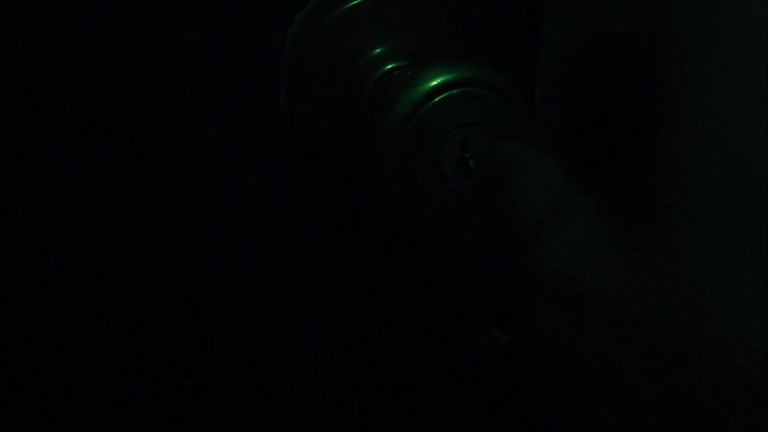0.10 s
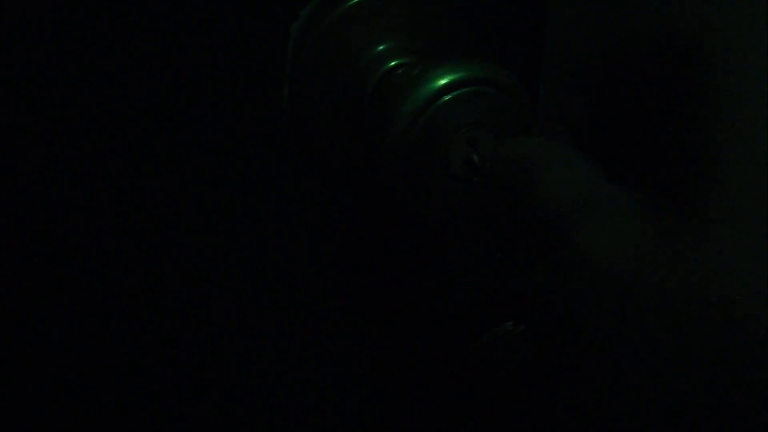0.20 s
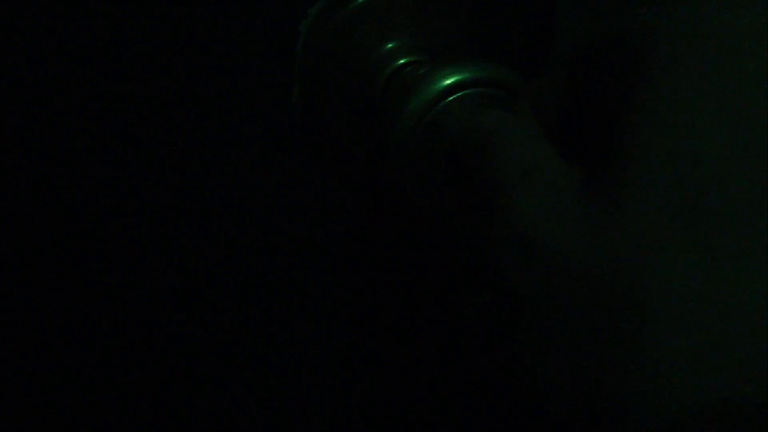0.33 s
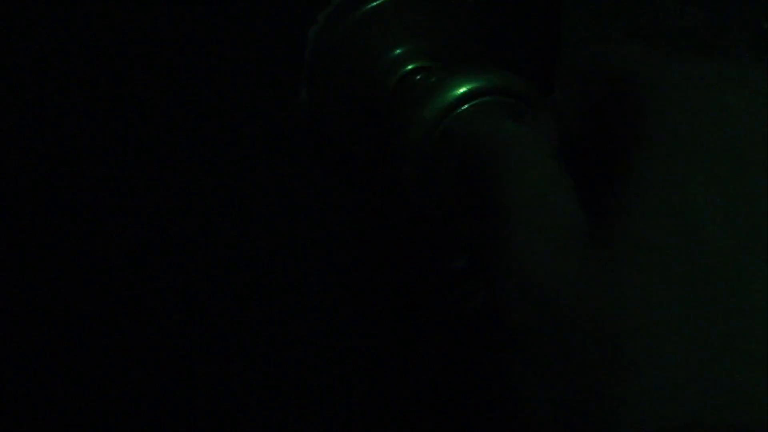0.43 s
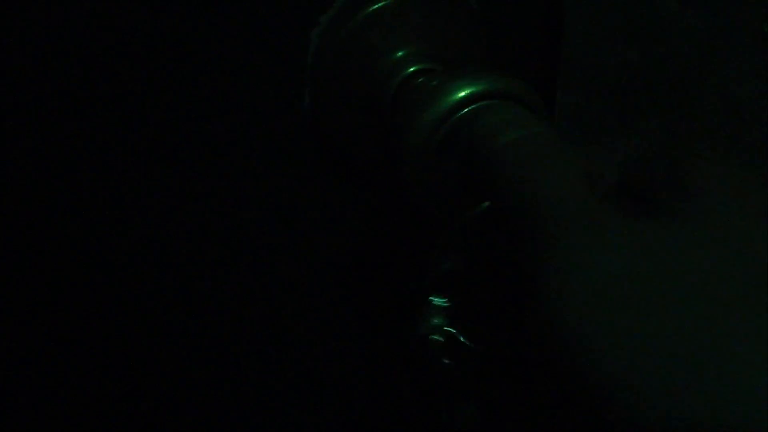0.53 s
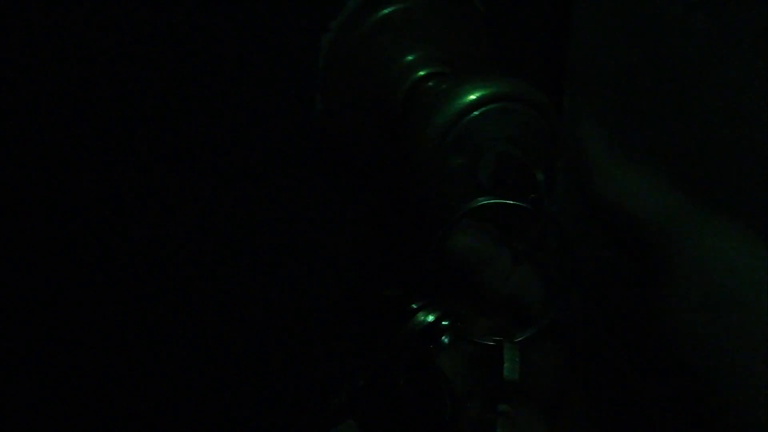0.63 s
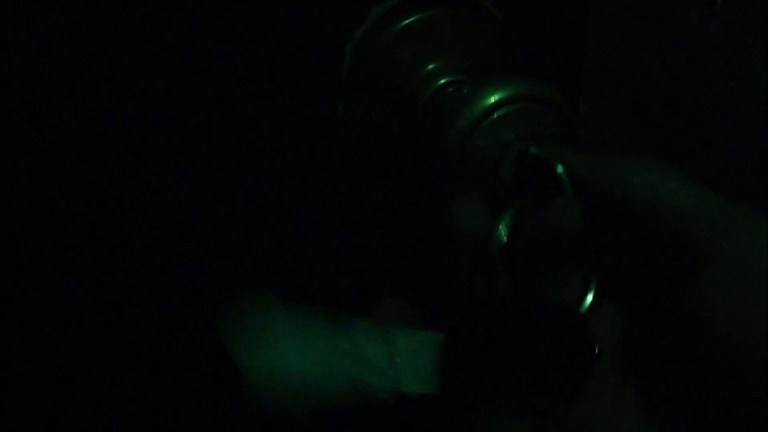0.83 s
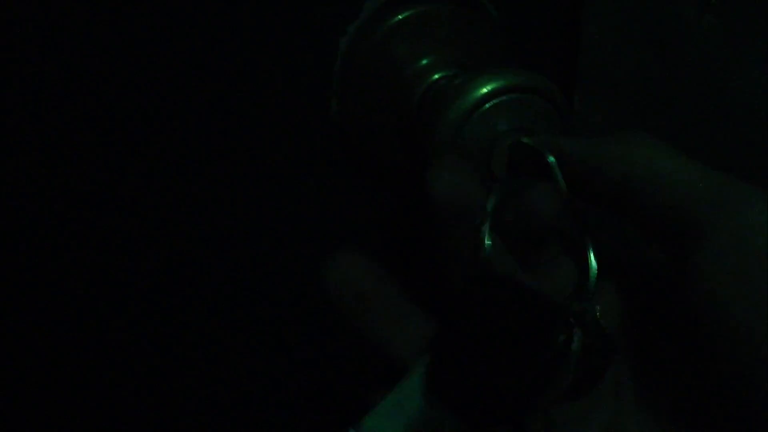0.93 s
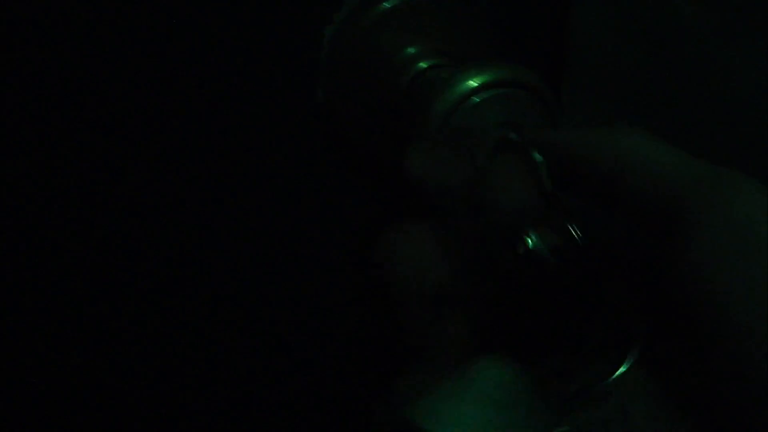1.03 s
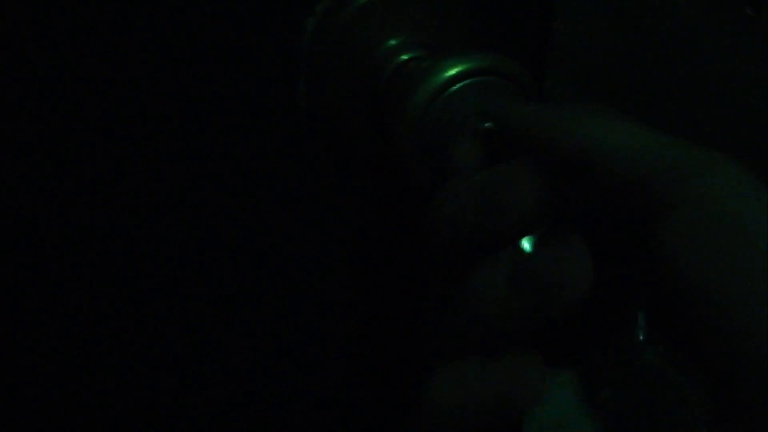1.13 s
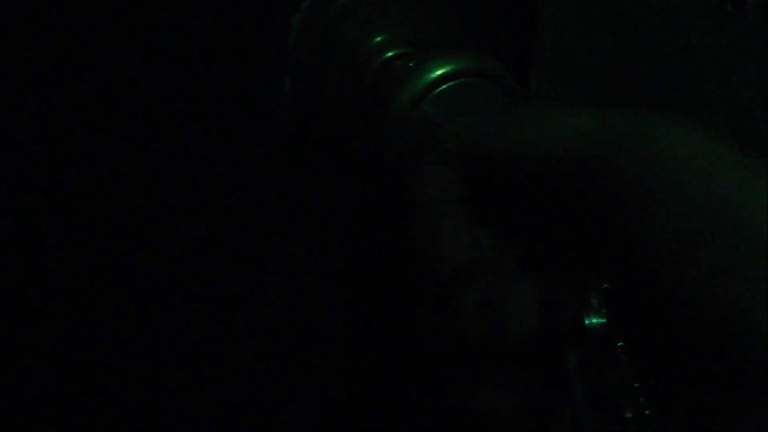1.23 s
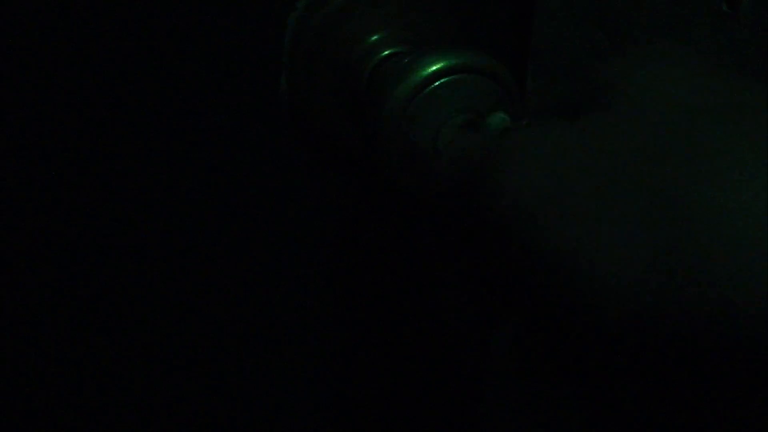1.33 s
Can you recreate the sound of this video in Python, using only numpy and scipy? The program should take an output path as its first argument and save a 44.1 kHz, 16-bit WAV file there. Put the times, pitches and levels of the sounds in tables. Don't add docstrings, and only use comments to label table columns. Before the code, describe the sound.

Keys jangle in a door lock, close up in stereo. Near silence with a faint click at 0.06 s; at 0.22-0.4 s the sticking bolt grinds and knocks the hollow wood amid sharp metallic cracks. Sparse bright clicks follow from 0.5-0.8 s. The bunch jingles loudest at 0.83-0.97 s, then weaker clinks, soft fob pats and a thin squeak near 1.3 s. Short porch reflections, faint night air.

```python
import sys
import numpy as np
from scipy import signal
from scipy.fft import rfft, irfft, next_fast_len
from scipy.io import wavfile
from scipy.ndimage import map_coordinates

SR = 44100
rng = np.random.default_rng(int(sys.argv[2]) if len(sys.argv) > 2 else 0)


def linear_from_db(decibels):
    return 10 ** (np.asarray(decibels, float) / 20)


def dump_mix(stems):
    frames = np.atleast_2d(stems).T
    limited = np.clip(frames, -1, 1)
    pcm = np.round(limited * 32767).astype(np.int16)
    wavfile.write(sys.argv[1], SR, pcm)


N = 61740

# frequency in Hz, density in dB per Hz.
CONTACT_NOISE = [(410, -11.5), (700, -12), (1380, -10), (4110, -3), (6270, -7.5), (9540, -4), (11900, -1.5),
                 (13500, -17.5)]
CRACK_T60_S = 0.011


def unit(x):
    return x / np.sqrt(np.mean(x ** 2) + 1e-20)


def along(points, hz):
    f, v = np.transpose(points)
    return np.interp(np.log(hz + 1), np.log(f + 1), v)


def curve(rows):
    return np.interp(np.arange(N) / SR, *np.transpose(rows))


def filtered(x, response):
    m = next_fast_len(N + SR // 2)
    return irfft(rfft(x, m) * response(np.fft.rfftfreq(m, 1 / SR)), m)[..., :N]


def add(track, s, sound):
    part = track[..., round(s * SR):][..., :sound.shape[-1]]
    part += sound[..., :part.shape[-1]]


def ring(hz, t60, t):
    return linear_from_db(-60 * t / t60) * np.sin(2 * np.pi * hz * t)


def sparks(per_s, spread_db):
    chance, sign, size = rng.random((3, N))
    return (chance < per_s / SR) * np.sign(sign - .5) * linear_from_db(-spread_db * np.log(size + 0.0024))


def flutter(t):
    return map_coordinates(rng.standard_normal(SR // 50), [t * 150])


def night():
    # frequency in Hz, density in dB per Hz.
    air_colour = [(15, -78), (25, -15.5), (200, 0), (386, -2.5), (464, -0.5), (620, -7), (1080, -5),
                  (10400, -31), (13500, -57)]
    # frequency in Hz, left-right likeness from 0 to 1.
    likeness = [(100, 0.09), (500, 0.067), (2000, 0.041)]
    level_db = -47.5

    def mid_side(hz):
        turn = np.arccos(np.clip(along(likeness, hz), -1, 1)) / 2
        return linear_from_db(along(air_colour, hz)) * [np.cos(turn), np.sin(turn)]

    mid, side = filtered(rng.standard_normal((2, N)), mid_side)
    return linear_from_db(level_db) * np.array([mid + side, mid - side]) / np.std(mid)


def porch(x):
    # frequency in Hz, decay time t60 in seconds.
    decay = [(200, 0.3), (2000, 0.092), (10000, 0.065)]
    out, step = np.zeros((2, N)), SR // 10
    for i in range(0, N, step):
        hz, t, z = signal.stft(rng.standard_normal((2, SR // 5)), SR, nperseg=64)
        fading = z * linear_from_db(-60 * t / along(decay, hz)[:, None])
        tail = signal.istft(fading, SR, nperseg=64)[1]
        tail = tail / np.linalg.norm(tail[0])
        add(out, i / SR + .001, signal.fftconvolve(x[None, i:i + step], tail, axes=1))
    return out


def door():
    # time in seconds, level in dB.
    push = [(0, -71), (.17, -44.5), (.22, -36), (.23, -16), (.275, -21), (.305, -16.5), (.385, -34),
            (.43, -37.5), (.48, -39.5), (.56, -34), (.62, -40.5), (.68, -38), (.72, -44.5), (1.04, -45),
            (1.2, -41), (1.33, -37), (1.35, -28), (1.4, -38)]
    # start in seconds, peak in dB, pitch in Hz.
    knocks = [(0.22, -8, 240), (0.31, -13.5, 400), (0.305, -5.5, 210), (0.34, -19, 213),
              (0.338, -15.5, 205), (0.52, -28, 191), (0.3, -10, 307), (.3, -8, 474), (.298, -9, 390),
              (.33, -13.5, 369), (.35, -13.5, 310), (1.28, -26, 460), (0.39, -16.5, 226), (.43, -22, 203),
              (1.346, -48, 214), (1.356, -33.5, 354)]
    # start in seconds, peak in dB, pitch in Hz.
    pats = [(.935, -33, 946), (.963, -27.5, 825), (1.0585, -23, 690), (1.066, -26.5, 950),
            (1.077, -33, 586), (1.087, -38, 860), (1.182, -30, 755), (1.191, -26, 770), (1.2866, -34, 490),
            (1.29, -32, 855), (1.344, -24.5, 734), (.668, -26, 716), (.1865, -23, 1700), (.188, -26, 2300),
            (.193, -34, 1200)]
    mode_hz = [214, 291, 358, 390, 474, 542, 694, 780, 893, 1158, 1507]
    # width in Hz, level in dB.
    modes = [(11.1, 6.5), (15.7, 5), (20.4, 5), (15.5, -6), (24.4, 3.5), (13, -2), (30.4, -4), (23.7, 1.5),
             (26, -1.5), (30.2, -4.5), (30, -4.5)]
    # frequency in Hz, level in dB.
    wood_body = [(80, -4.5), (170, 3.5), (400, -1), (1200, -1), (2000, -5), (3200, -15.5), (6000, -48)]
    slips_per_s, slip_spread_db, grind_db = 2000, 2.5, -5.5
    body_db, knock_db, contact_s = -5, -13, .0012
    knock_cycles, pat_cycles = 35, 7.8

    def panel(f):
        response = linear_from_db(body_db)
        for c, (w, db) in zip(mode_hz, modes):
            response = response + linear_from_db(db) * 1j * f * w / (c * c - f * f + 1j * f * w)
        return linear_from_db(along(wood_body, f)) * response

    slips, t = sparks(slips_per_s, slip_spread_db), np.arange(SR // 5) / SR
    blows, thuds = np.zeros((2, N))
    for s, db, hz in knocks:
        add(blows, s, linear_from_db(db + knock_db + 8.5) * np.hanning(round(contact_s * SR)))
        add(thuds, s, linear_from_db(db - 9.5) * ring(hz, knock_cycles / hz, t))
    for s, db, hz in pats:
        add(thuds, s, linear_from_db(db) * ring(hz, pat_cycles / hz, t))
    grind = slips * linear_from_db(curve(push) + grind_db) / np.std(filtered(slips, panel))
    return filtered(grind + blows, panel) + filtered(thuds, lambda f: (1j * f / (170 + 1j * f)) ** 2)


def rattle():
    # time in seconds, level in dB.
    shaking = [(0, -70), (.22, -77), (.23, -39), (.29, -36), (.33, -31.5), (.39, -37), (.42, -53.5),
               (.49, -61.5), (.53, -41), (.61, -54.5), (.68, -40.5), (.71, -55.5), (.827, -42), (.831, -38),
               (.92, -36), (.93, -48), (.975, -33), (.992, -50.5)]
    # time in seconds, level in dB.
    swinging = [
        (1.0, -48),
        (1.035, -53.5),
        (1.045, -54),
        (1.08, -62),
        (1.1, -43),
        (1.15, -50.5),
        (1.2, -44),
        (1.32, -60.5),
        (1.35, -51.5),
        (1.4, -53),
    ]
    # frequency in Hz, level in dB.
    key_modes = [(2290, 6), (3300, -10), (4150, 6.5), (6200, 3.5), (6900, 5), (7750, 7.5), (9500, 6.5),
                 (10050, 12.5), (11350, 6), (11750, -6)]
    ticks_per_s, tick_spread_db, tick_t60_s = 1200, 3.5, .014
    ticks_db, scrape_db = 2.5, 5
    t = np.arange(SR // 20) / SR
    ticks = np.zeros(N)
    for hz, db in key_modes:
        struck = sparks(ticks_per_s / 3, tick_spread_db)
        ticks += linear_from_db(db) * signal.fftconvolve(struck, ring(hz, tick_t60_s, t))[:N]
    catches = sparks(ticks_per_s, tick_spread_db)
    grit = np.abs(signal.fftconvolve(catches, linear_from_db(-60 * t / CRACK_T60_S))[:N])
    hiss = rng.standard_normal((2, N)) + 0.84 * rng.standard_normal(N)
    scrape = filtered((.5 + unit(grit)) * hiss, lambda hz: linear_from_db(along([(100, -66)] + CONTACT_NOISE, hz)))
    motion = linear_from_db(curve(shaking + swinging[1:]))
    return motion * (linear_from_db(ticks_db) * unit(ticks) + linear_from_db(scrape_db) * unit(scrape))


def squeak():
    # time in seconds, pitch in Hz, level in dB.
    glide = [
        (1.264, 4380, -66),
        (1.271, 4362, -49),
        (1.3, 4320, -50),
        (1.312, 4285, -45),
        (1.33, 4235, -52),
        (1.345, 4230, -70),
    ]
    s, hz, db = np.transpose(glide)
    t = np.arange(N) / SR
    level = linear_from_db(np.interp(t, s, db, -120, -120) + 3.2 * flutter(t))
    return level * np.sin(2 * np.pi * np.cumsum(np.interp(t, s, hz)) / SR)


def chimes():
    # start in seconds, pitch in Hz, level in dB, decay time t60 in seconds.
    free_keys = [(.061, 10340, -79, 0.25), (.354, 6870, -33, 0.16), (0.508, 11600, -32, 0.034),
                 (0.554, 9750, -27.5, 0.059), (0.67, 11730, -34.5, 0.27), (0.724, 11750, -34.5, .08),
                 (.8295, 6200, -29, .12), (.8295, 6870, -29, .08), (.8295, 11350, -24, .2),
                 (0.831, 10020, -27, 0.13), (0.865, 6850, -20, 0.06), (0.966, 4170, -48, 0.054),
                 (0.955, 7100, -27, 0.12), (0.973, 4180, -26.5, 0.023), (1.348, 3400, -46, .04),
                 (1.152, 4200, -33, 0.03)]
    flutter_db = 3
    out, t = np.zeros(N), np.arange(SR // 3) / SR
    for s, hz, db, t60 in free_keys:
        add(out, s, linear_from_db(db + flutter_db * flutter(t)) * ring(hz, t60, t))
    return out


def spikes():
    # start in seconds, peak in dB.
    edge_knocks = [(.2425, -8), (.3548, -7), (.8293, -10), (.8545, -14), (.9394, -6), (.9557, -14),
                   (1.0405, -20), (1.1455, -13), (.6806, -19), (.1803, -30), (1.1235, -20)]
    pulse_hz, pulse_t60_s = 3480, .0012
    out, t = np.zeros(N), np.arange(SR // 200) / SR
    for s, db in edge_knocks:
        add(out, s, linear_from_db(db - 2) * ring(pulse_hz, pulse_t60_s, t))
    return out


def hits():
    # start in seconds, peak in dB, ring in Hz, crack over ring in dB. Loose contacts
    loose_contacts = [(0.06, -15.5, 10620, -14.5), (0.185, -48, 2060, -8.5), (0.207, -53, 1680, 25),
                      (0.2287, -14, 2340, 5.5), (0.2417, -14.5, 3690, 6.5), (0.3025, -5, 9930, 1),
                      (0.3226, -6.5, 9340, -3), (0.3534, -9.5, 10370, 3.5), (0.507, -20, 11470, 0.5),
                      (0.5194, -29, 1630, -8), (0.5539, -20, 10700, 2), (0.6019, -31.5, 1720, 5),
                      (0.625, -27, 9300, 4), (0.6397, -19, 8080, -7), (0.6656, -23.5, 11200, 7.5),
                      (0.6799, -12, 10100, -15), (0.7449, -23, 9450, 5.5), (0.7691, -17.5, 9460, 3.5),
                      (0.7882, -28.5, 10400, 11.5),
                      (0.854, -12, 6120, 4), (0.8639, -10.5, 6780, 2), (0.8781, -5.5, 9920, -17),
               (0.9008, -8.5, 7770, -5.5), (0.9108, -6, 10890, -10), (0.9451, -13, 9360, -17),
               (0.9554, -12.5, 7120, 6), (1.0404, -27.5, 4050, 15), (1.0915, -29, 3690, 12.5),
               (1.1235, -19.5, 3236, 2), (1.1288, -18, 2660, 8), (1.1448, -11, 6960, 3.5),
               (1.1535, -49, 3950, 0), (1.1758, -34.5, 9150, 16), (1.1907, -23.5, 1650, 11.5),
               (1.2216, -28.5, 2980, 2), (1.2594, -26.5, 7140, 7.5), (1.2852, -26, 10470, 0),
               (1.3615, -17, 3330, -7)]
    single_contacts = [
        (.1797, -36, 2900, 10),
        (.6806, -24, 2700, 11),
        (.8291, -18, 6800, 9),
        (1.3445, -24, 2200, 0),
                       (.9385, -5, 9400, 4.5), (0.9396, -15.5, 3250, -9), (0.9551, -21.5, 4020, 2),
              (0.9657, -2.5, 4130, -3), (0.898, -16, 4640, 4), (0.901, -13.5, 4460, -20),
              (.913, -17, 3360, 0), (.8745, -8, 9260, 1), (1.045, -19.5, 4100, -12),
              (1.049, -21.5, 1920, 4.5), (1.096, -20.5, 3820, 3.5), (1.1455, -15, 5900, -12),
              (1.3445, -23.5, 3340, -7), (1.354, -24, 2860, 3), (1.3654, -22.5, 4150, 0)]
    rise_s, ring_t60_s, ring_blur = 0.00056, 0.017, .02
    bounce_s, bounce_db = 0.0029, -2
    rings, cracks, t = np.zeros(N), np.zeros((2, N)), np.arange(SR // 10) / SR
    rise = 1 - np.exp(-t / rise_s)

    def crack(s, db):
        noise = rng.standard_normal((3, len(t)))
        both_sides = noise[0] + 0.62 * noise[1:]
        add(cracks, s, linear_from_db(db - 6.0 - 60 * t / CRACK_T60_S) * rise * both_sides)

    for bounces, contacts in (True, loose_contacts), (False, single_contacts):
        for s, db, hz, crack_db in contacts:
            near = hz * (1 + ring_blur * rng.standard_normal(3) * [0, 1, 1])
            add(rings, s, linear_from_db(db - 11) * rise * sum(ring(f, ring_t60_s, t) for f in near))
            crack(s, db + crack_db)
            if bounces:
                crack(s + bounce_s * rng.uniform(0.36, 2.5), db + crack_db + bounce_db)
    return rings + filtered(cracks, lambda hz: linear_from_db(along([(100, -62)] + CONTACT_NOISE, hz) + 5.5))


def scene():
    key_wet_db, door_wet_db = -4.5, -5
    keys_pan_db, door_pan_db = -1, 1.5
    right_leads_s = 2.4e-5
    air, wood = night(), door()
    metal = rattle() + squeak() + chimes() + hits() + spikes()
    lag = lambda hz: np.exp(np.array([[-1j], [1j]]) * np.pi * hz * right_leads_s)
    keys = filtered(metal, lag) + porch(linear_from_db(key_wet_db) * metal.mean(0))
    panel = wood + porch(linear_from_db(door_wet_db) * wood)
    keys = keys * linear_from_db([[keys_pan_db / 2], [-keys_pan_db / 2]])
    return keys + panel * linear_from_db([[door_pan_db], [0]]) + air


def roll_off(x):
    return signal.sosfilt(signal.butter(12, 14210, fs=SR, output="sos"), x)


def record(dry):
    # frequency in Hz, level in dB.
    ports = [(60, 1), (180, -13), (350, -9), (700, -1), (1400, 5.5), (2800, 3), (6000, 1), (12000, -1)]
    low_hz, top_hz = 126, 13100
    mid = dry.mean(0)
    side = filtered((dry[0] - dry[1]) / 2, lambda hz: linear_from_db(along(ports, hz)))
    band = lambda hz: (1j * hz / (low_hz + 1j * hz)) ** 2 / (1 + (hz / top_hz) ** 90)
    return roll_off(filtered(np.array([mid + side, mid - side]), band))


dry = scene()
out = record(dry)
dump_mix(out)
```